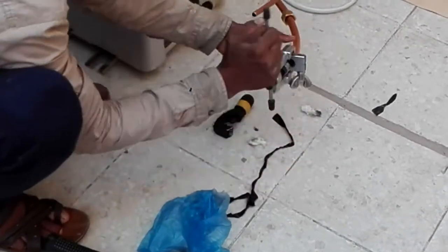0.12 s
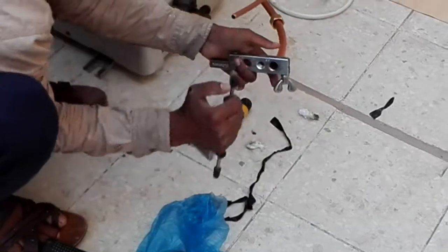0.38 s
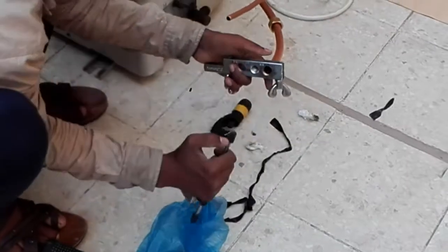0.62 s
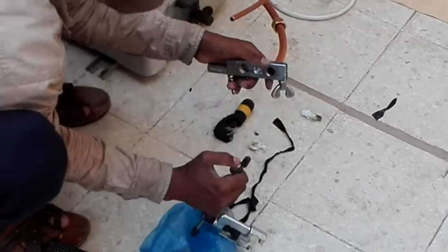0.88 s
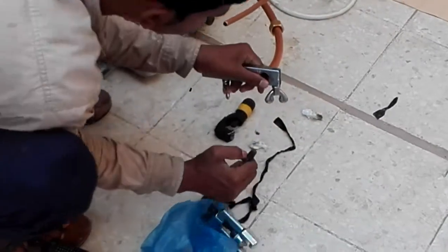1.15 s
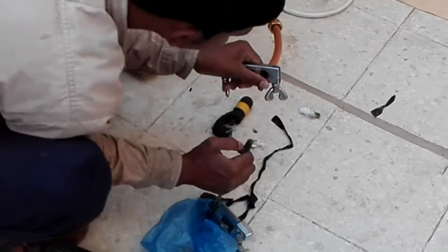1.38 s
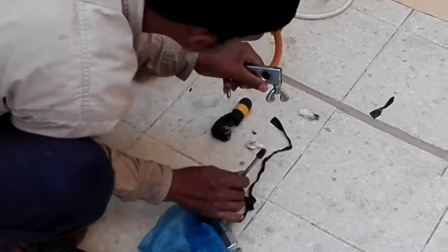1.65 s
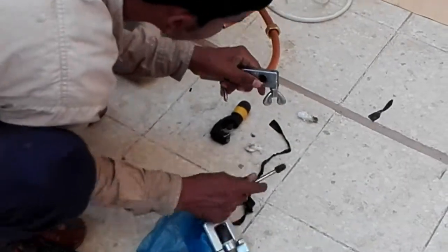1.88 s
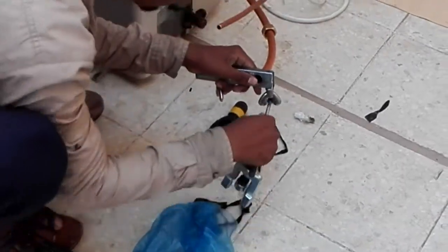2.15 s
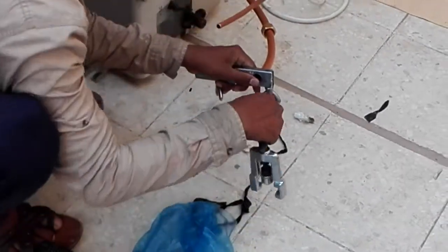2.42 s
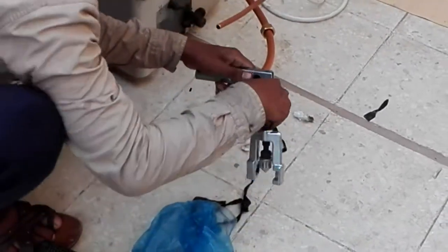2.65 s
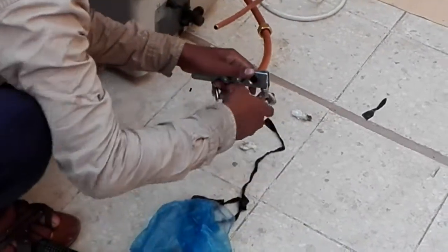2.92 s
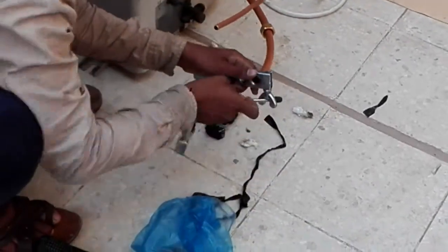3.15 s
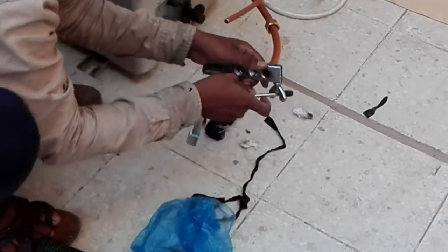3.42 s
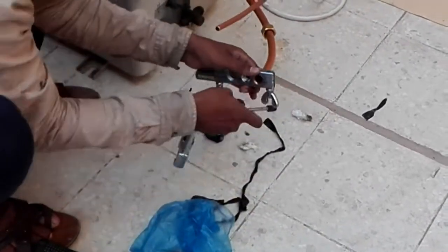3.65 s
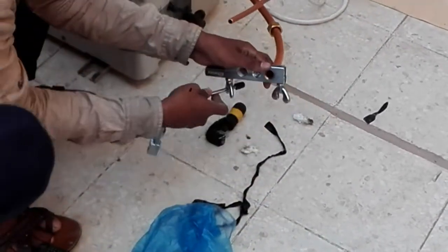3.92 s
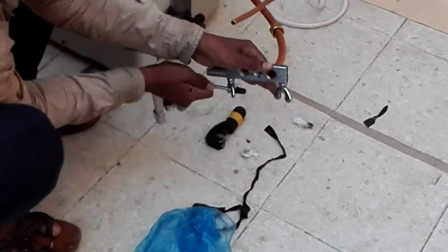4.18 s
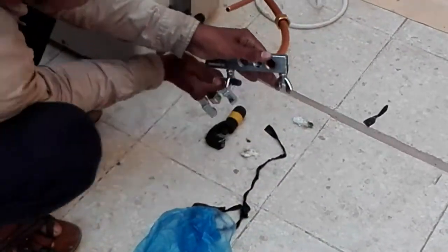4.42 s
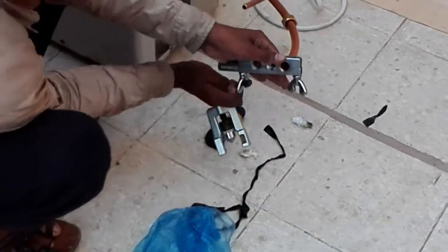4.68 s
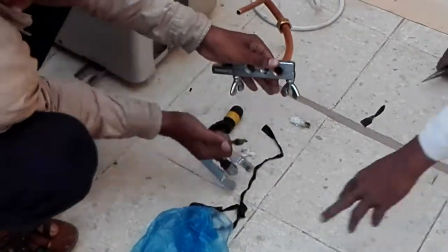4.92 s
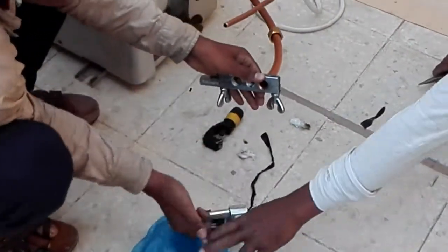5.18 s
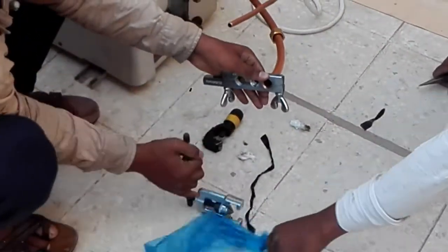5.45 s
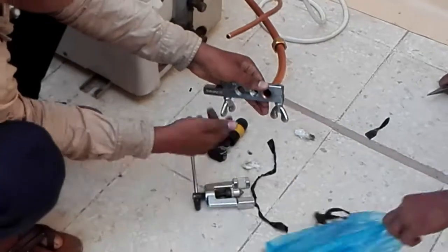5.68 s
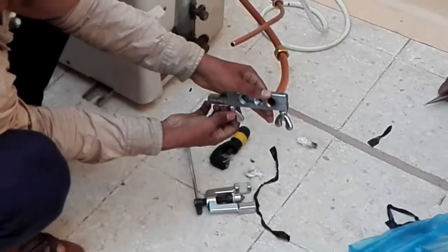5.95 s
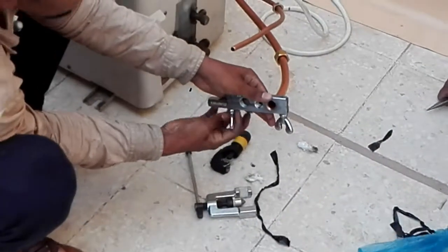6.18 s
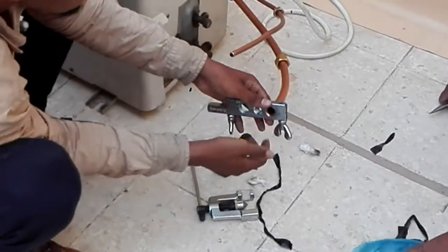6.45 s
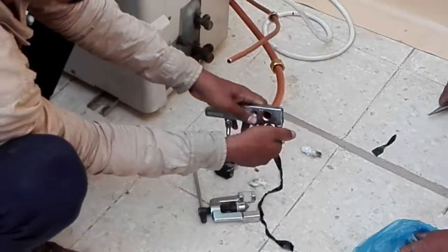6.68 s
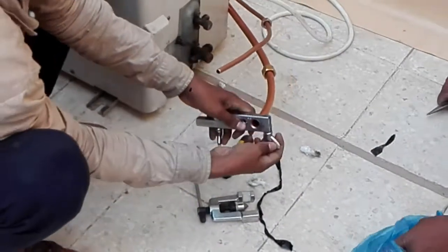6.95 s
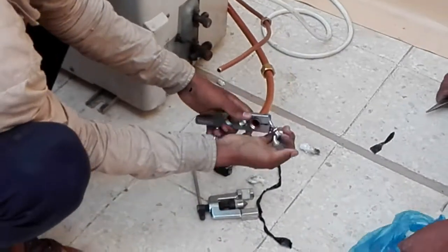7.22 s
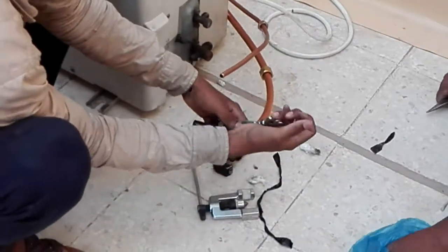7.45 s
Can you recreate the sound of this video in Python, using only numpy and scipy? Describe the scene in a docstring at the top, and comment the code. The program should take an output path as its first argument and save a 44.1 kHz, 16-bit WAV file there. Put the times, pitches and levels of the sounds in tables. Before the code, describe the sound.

Close metallic clinks and short bright clatters as steel parts are handled and set down on tile, amid soft rustling and low hum.

```python
"""Steel parts of a pipe flaring tool knock together and touch a tiled floor, close to a mono phone microphone.
Each contact cracks (noise burst) and clatters (noise through steel modes); clinks, a loose screw and a
scrape ring single modes (sines); heavy parts thump the tile (low noise).
Hands, sleeves and a plastic bag rustle in between (hiss and scuff noise in strokes).
A machine hums farther off (dull noise and blurred lines) and moving air buffets the microphone (low noise)."""
import sys
import numpy as np
from scipy import signal
from scipy.fft import rfft, irfft, next_fast_len
from scipy.io import wavfile
from scipy.ndimage import uniform_filter1d, map_coordinates

SR = 44100
rng = np.random.default_rng(int(sys.argv[2]) if len(sys.argv) > 2 else 0)


def invert_db(level):
    """Linear amplitude ratio for a level in decibels (20 dB per decade), elementwise."""
    return 10 ** (np.asarray(level, dtype=float) / 20)


def store_wav(level_fs):
    """Save 16-bit WAV to argv[1]."""
    pcm = np.round(np.clip(np.atleast_2d(level_fs), -1, 1) * 32767)
    wavfile.write(sys.argv[1], SR, pcm.T.astype(np.int16))


N = 334278
TIME_S = np.arange(N) / SR

# modes of the steel parts: f/Hz
MODES_HZ = [1082, 1150, 1230, 1370, 1600, 1800, 1975, 2130, 2300, 2450, 2640, 2850, 3140, 3720, 4320, 5140,
            5370, 5910, 6187, 7370, 7850, 8467, 9293, 9359, 9520, 10316, 12200, 14090]
GATE_DB_PER_S = 1499  # slope of sudden starts and stops


def unit(x):
    """Scaled to rms 1."""
    return x / np.sqrt(np.mean(x ** 2) + 1e-20)


def along(points, hz):
    """(Hz, value) points interpolated on a log frequency axis."""
    f, v = np.transpose(points)
    return np.interp(np.log(hz + 1), np.log(f + 1), v)


def wobble(knots_per_s):
    """Smooth random curve through normal knots."""
    knots = rng.standard_normal(int(N * knots_per_s / SR) + 4)
    return map_coordinates(knots, [np.arange(N) * knots_per_s / SR])


def filtered(x, response):
    """x times a response of frequency."""
    m = next_fast_len(len(x) + 8192)
    return irfft(rfft(x, m) * response(np.fft.rfftfreq(m, 1 / SR)), m)[:len(x)]


def rush(spectrum, patchy_db):
    """Coloured noise of rms 1 with time-frequency patches of random gain."""
    z = signal.stft(rng.standard_normal(N), nperseg=256)[2]
    field = uniform_filter1d(rng.standard_normal(z.shape), size=5, axis=0)
    field = uniform_filter1d(field, size=8, axis=1)
    patchy = signal.istft(z * invert_db(patchy_db * unit(field)), nperseg=256)[1][:N]
    return unit(filtered(patchy, lambda hz: invert_db(along(spectrum, hz))))


def add(track, s, x):
    """Mix x into track from time s."""
    track[round(s * SR):][:len(x)] += x


def room(x, wet_db):
    """Short tiled-room tail, each frequency dying at its own speed, drawn anew for every sound."""
    # f/Hz, t60/s
    decay = [(300, 0.92), (2000, 0.25), (12000, 0.12)]
    hz, t, z = signal.stft(rng.standard_normal(SR // 4), SR, nperseg=256)
    fade_db = -60 * t / along(decay, hz)[:, None]
    tail = signal.istft(z * invert_db(fade_db), SR, nperseg=256)[1]
    tail = np.pad(tail / np.linalg.norm(tail), (round(.004 * SR), 0))  # 4 ms late
    return x + invert_db(wet_db) * signal.fftconvolve(x, tail)[:len(x)]


def hum():
    """Distant machine: dull noise with blurred lines near multiples of its turning rate."""
    # dull noise spectrum: f/Hz, relative level/dB per Hz
    spectrum = [(53, -47.5), (90, -0.5), (124, -26), (278, 0.5), (395, -13), (437, -7), (467, -19),
                (500, -12), (601, -18.5), (665, -29.5), (1120, -20.5), (1220, -24), (2050, -27),
                (2390, -57.5), (5000, -40.5), (6500, -64), (11000, -120)]
    # resonances, each passed twice: f/Hz, single-pass width/Hz, single-pass relative gain/dB
    resonances = [(96.5, 8.3, -9), (196.5, 10.6, 4.5), (275.3, 14.7, 3), (607.8, 37.5, -1.5),
                  (1134, 31, -3.5)]

    def one_pass(f):
        return sum(invert_db(db) * 1j * f * w / (c * c - f * f + 1j * f * w) for c, w, db in resonances)

    tones = unit(filtered(rng.standard_normal(N), lambda f: one_pass(f) ** 2))
    noise = invert_db(-53 + 1.46 * wobble(3.676)) * rush(spectrum, patchy_db=2.5)
    return noise + invert_db(-57.0 + 2.3 * wobble(4.19)) * tones


def buffet():
    """Lumpy low rumble of air on the port, with one strong push and rebound."""
    # rumble over time: t/s, relative level/dB
    swell = [(0.0, -44.5), (0.15, -44.5), (0.27, -51.5), (0.65, -44), (1.9, -48), (2.15, -36), (2.2, -26.5),
             (2.26, -44.5), (2.7, -58), (2.79, -48.5), (3.42, -54), (3.57, -37.5), (3.61, -45.5),
             (4.83, -43), (5.15, -53), (5.62, -51), (5.72, -39), (5.93, -53), (6.84, -51), (7.58, -52)]
    # rumble spectrum: f/Hz, relative level/dB per Hz
    spectrum = [(12, -21.5), (20, 3.5), (118, -12), (152, -12), (216, -17), (300, -21.5), (390, -37.5),
                (660, -120)]
    push_s, push_db, push_hz = 2.19, -21, 49
    u = (TIME_S - push_s) * push_hz  # cycles from the push
    push = invert_db(push_db) * np.sin(2 * np.pi * u) * np.exp(-np.where(u > 0, 1.4 * u, 3 * u * u))
    lumps = invert_db(2.5 * wobble(14))
    lumpy = unit(lumps * rush(spectrum, patchy_db=2.0))
    swell_s, swell_db = np.transpose(swell)
    return invert_db(np.interp(TIME_S, swell_s, swell_db) + 1.5) * lumpy + push


def rustle():
    """Skin, cloth, thin plastic rubbing: strokes of bright hiss and duller uneven scuff over a steady floor."""
    # strokes: start t/s, rise/s, end t/s, relative hiss level/dB, relative scuff level/dB
    strokes = [(-.05, .04, 0.014, -49.5, -42), (0, .01, 0.26, -57.5, -57), (.17, 0.062, 0.29, -70, -49.5),
               (.31, 0.024, 0.48, -70, -73), (1.575, 0.02, 1.85, -61.5, -63.5),
               (2.02, 0.089, 2.156, -50.5, -62), (2.3, 0.26, 2.58, -58.5, -78),
               (2.6, 0.045, 2.84, -52.5, -56), (3.8, 0.24, 4.05, -74, -53), (4.85, 0.19, 4.95, -57, -49),
               (5.14, 0.078, 5.27, -59.5, -48.5), (5.579, 0.039, 5.72, -69, -56),
               (5.8, 0.26, 6.06, -54.5, -76), (6.06, 0.21, 6.455, -37, -45.5),
               (6.36, 0.053, 6.67, -47.5, -44.5), (6.47, 0.06, 6.7, -40.5, -57),
               (6.68, 0.033, 6.78, -56, -54), (6.8, .03, 6.9, -53.5, -74), (7.08, 0.14, 8.12, -49, -59.5),
               (7.4, 0.21, 8.9, -65, -54)]
    # spectra: f/Hz, relative level/dB per Hz
    hiss_spectrum = [(2060, -33), (3500, -5.5), (4480, -9.5), (6530, -8), (9140, -7.5), (13200, -12),
                     (14300, -7)]
    scuff_spectrum = [(500, -40), (1000, -8), (1150, -2), (1400, -6), (2300, -2), (3500, -3), (5000, -11),
                      (8000, -28)]
    rise_db, fall_db_per_s = 21.5, 422
    floor_hiss_db, floor_scuff_db = -71.5, -63.5  # steady background hiss and dull noise
    scraped_below_hz, lift_db, relative_width = 4000, 3, 0.0054  # rubbing wakes the lower steel modes

    hiss_power = invert_db(floor_hiss_db) ** 2
    scuff_power = invert_db(floor_scuff_db + 0.58 * wobble(3.18)) ** 2
    for s, rise_s, end_s, hiss_db, scuff_db in strokes:
        climb_db = -rise_db * np.clip(1 - (TIME_S - s) / rise_s, 0, 9)
        fall_db = -fall_db_per_s * np.clip(TIME_S - end_s, 0, 1)
        shape = invert_db(climb_db + fall_db) ** 2
        hiss_power = hiss_power + invert_db(hiss_db) ** 2 * shape
        scuff_power = scuff_power + invert_db(scuff_db) ** 2 * shape

    def steel_lift(hz):
        woken = [c for c in MODES_HZ if c < scraped_below_hz]
        peaks = sum(invert_db(lift_db) ** 2 / (1 + ((hz - c) / (relative_width * c)) ** 2) for c in woken)
        return np.sqrt(1 + peaks)

    grain = wobble(60)
    hiss_noise = rush(hiss_spectrum, patchy_db=1.6)
    scuff_noise = unit(filtered(rush(scuff_spectrum, patchy_db=2.0), steel_lift))
    hiss = np.sqrt(hiss_power) * invert_db(0.37 * grain) * hiss_noise
    scuff = np.sqrt(scuff_power) * invert_db(0.63 * grain - 3.5) * scuff_noise
    return hiss + scuff


def thumps():
    """The weight of a part set down drives a dull puff through the tile."""
    # t/s, relative level/dB, t60/s
    puffs = [(1.112, -34.5, 0.34), (1.821, -39, 0.11), (5.865, -27, 0.17), (6.506, -31.5, 0.09),
             (6.568, -30, 0.14), (6.612, -36, 0.18)]
    # tile spectrum: f/Hz, relative level/dB per Hz
    tile = [(60, -31), (120, -1), (200, 4), (400, -9), (700, -11.5), (1100, -34)]
    out = np.zeros(N + SR)
    t = np.arange(SR // 4) / SR
    for s, db, t60 in puffs:
        puff = unit(filtered(rng.standard_normal(len(t)), lambda hz: invert_db(along(tile, hz))))
        add(out, s, puff * invert_db(db - 60 * t / t60) * (1 - np.exp(-t / 0.0051)))
    return out[:N]


def scrape():
    """Steel dragged over steel: uneven friction feeds a few modes until the part is lifted."""
    # modes kept sounding: f/Hz, rms level/dB
    ringing = [(1150, -58), (2050, -60.5), (3720, -58.5)]
    start_s, end_s = 2.652, 2.795
    relative_blur = .07  # knots per cycle
    gate_db = -GATE_DB_PER_S * (np.clip(start_s - TIME_S, 0, 1) + np.clip(TIME_S - end_s, 0, 1))
    out = np.zeros(N)
    for hz, db in ringing:
        fed = .5 + wobble(relative_blur * hz) + 1j * wobble(relative_blur * hz)
        out += invert_db(db) * np.imag(fed * np.exp(2j * np.pi * hz * TIME_S))
    return invert_db(gate_db) * out


def chatter():
    """Loose screw: a light rattle swells, sags, is damped by hand; knocks make weak modes stutter."""
    # modes rung (nearest steel mode is used):
    # f/Hz, light rattle level/dB, full at t/s, full level/dB, damped from t/s
    ringing = [(3690, -46, 6.597, -35.5, 6.69), (5170, -49.5, 6.65, -46.5, 6.69),
               (6230, -51, 6.575, -30, 6.688), (7380, -47, 6.6, -38, 6.69),
               (8460, -46, 6.615, -27.5, 6.702), (9520, -52, 6.64, -51, 6.89),
               (14090, -51.5, 6.53, -49.5, 6.69)]
    rattle_start_s, sag_db_per_s, damp_db_per_s = 6.507, 40.5, 599
    kicks_per_s, kick_max_db, kick_decay_s = 160, -43.5, 0.011

    t = TIME_S
    out = np.zeros(N)
    kicks = rng.random(N) < kicks_per_s / SR  # same instants for all modes
    fade = np.exp(-t[:SR // 20] / kick_decay_s)
    for near_hz, light_db, full_s, full_db, damped_s in ringing:
        hz = min(MODES_HZ, key=lambda mode: abs(mode - near_hz))
        swell_db = np.maximum(light_db, full_db - GATE_DB_PER_S * (full_s - t))
        sag_db = full_db - sag_db_per_s * (t - full_s)
        fed_db = np.where(t < full_s, swell_db, sag_db)
        gate_db = -GATE_DB_PER_S * np.clip(rattle_start_s - t, 0, 1)
        gate_db = gate_db - damp_db_per_s * np.clip(t - damped_s, 0, 1)
        sizes = rng.standard_normal(N) + 1j * rng.standard_normal(N)
        jolts = signal.fftconvolve(kicks * sizes, fade)[:N]
        kick_db = np.minimum(kick_max_db, fed_db - 3.5)
        swing = invert_db(fed_db + 1.2 * wobble(60)) + invert_db(kick_db) * jolts
        carrier = np.exp(2j * np.pi * hz * t + .3j * wobble(50))
        out += np.sqrt(2) * invert_db(gate_db) * np.imag(swing * carrier)
    return out


def clinks():
    """The struck spot picks the mode, short contacts wake neighbours; rough rings cut off from 90 ms on."""
    # t/s, level/dB, most excited f/Hz, t60/s before the cut
    strikes = [(.23, -39.5, 1150, .18), (.818, -33, 4320, .11), (.845, -42, 4320, .16),
               (.822, -48, 2300, .2), (.85, -48, 2750, .12), (.819, -46, 5910, .1), (.819, -55, 8467, .22),
               (0.823, -48.5, 1150, 0.093), (.954, -39, 4320, 0.051), (.952, -41, 2450, .07),
               (.968, -44, 2640, .05), (.984, -44, 2500, .08), (1.0, -46, 2380, .12),
               (.955, -55.5, 6187, .9), (.955, -58, 7370, .45), (.977, -49, 3720, 0.2),
               (1.111, -28, 1082, 0.25), (1.112, -32, 3140, .07), (1.111, -32, 1975, 0.14),
               (1.361, -47, 1082, .31), (1.821, -21, 3720, 0.09), (1.822, -36, 5140, .06),
               (1.824, -37, 6187, .09), (1.821, -22, 10316, 0.062), (1.818, -18, 2200, .016),
               (1.8365, -19, 1800, .022), (2.649, -42, 3720, 0.093), (2.785, -49.5, 7370, .1),
               (3.033, -29.5, 4320, 0.034), (3.034, -40, 2300, 0.09), (3.034, -42, 2850, .07),
               (3.058, -44, 1800, .15), (3.072, -40, 2380, .15), (3.057, -30, 8467, .045),
               (3.056, -21, 4320, 0.058), (3.126, -41, 2380, .2), (3.124, -35, 4320, .04),
               (3.126, -38, 2850, .05), (3.14, -58, 6187, .3), (3.499, -48, 4320, 0.052),
               (3.498, -41, 2330, 0.13), (3.738, -43, 6187, 0.06), (3.956, -44, 1150, .2),
               (4.6, -53.5, 7370, .11), (4.673, -33, 1560, 0.1), (4.69, -44, 2850, .35),
               (4.688, -41, 1230, 0.7), (4.674, -33, 2740, .14), (4.67, -27, 3720, .03),
               (4.735, -34, 7850, .08), (4.777, -28, 8467, .04), (4.729, -40, 3140, .079),
               (4.737, -30, 1290, 0.22), (4.745, -33.5, 3720, 0.11), (4.796, -21, 3720, .027),
               (4.779, -30, 2850, .035), (4.799, -39, 1150, 0.3), (4.8, -35, 2640, 0.14),
               (4.855, -46, 7370, .088), (5.001, -24, 8090, .027), (5.045, -28.5, 7370, .038),
               (5.16, -49, 2050, .4), (5.193, -26, 12170, 0.075), (5.645, -51.5, 9060, .074),
               (5.647, -47, 7600, .04), (5.864, -33, 10316, .08), (5.868, -22.5, 7276, 0.082),
               (5.88, -33, 3720, 0.084), (5.9, -41, 8467, .13), (6.438, -41, 9300, .36),
               (6.508, -33, 1150, 0.25), (6.504, -25, 1900, .018), (6.53, -41, 7370, .4),
               (6.598, -36, 9320, .12), (6.614, -32, 1600, .03), (6.632, -34, 1800, .03),
               (6.674, -36, 5140, .07), (6.567, -12.5, 6187, 0.045), (6.566, -12, 3720, 0.027),
               (6.576, -29, 5140, 0.067), (6.612, -27, 10316, 0.1), (6.637, -25, 5140, .06),
               (6.793, -30, 5140, .04), (6.792, -36, 8467, 0.045), (6.878, -36, 8467, 0.04),
               (6.792, -36, 1600, .02), (6.797, -38, 3720, .07), (6.88, -45, 5140, .07),
               (6.881, -46, 3720, .05), (6.925, -50, 8467, .07), (6.931, -51, 5370, .06),
               (6.883, -39, 7850, .035)]
    out = np.zeros(N + SR)
    t = np.arange(SR // 3) / SR
    hz = np.array(MODES_HZ)[:, None]
    cut_db = -600 * np.clip(t - .09, 0, None)  # rings are cut off quickly from 90 ms on
    for s, db, struck_hz, t60 in strikes:
        slope_db_per_octave = -150 * min(t60 / .05, 1)
        mode_db = slope_db_per_octave * np.abs(np.log2(hz / struck_hz)) + 2 * rng.standard_normal(hz.shape)
        shake = unit(uniform_filter1d(rng.standard_normal((2, len(hz), len(t))), size=200))
        tones = invert_db(mode_db + 2.5 * shake[0]) * np.sin(2 * np.pi * hz * t + 0.64 * shake[1])
        envelope = invert_db(db + cut_db - 60 * t / max(t60, .01)) * (1 - np.exp(-t / 0.0011))
        add(out, s, room(np.sum(tones, axis=0) * envelope, wet_db=-17))
    return out[:N]


def blows():
    """Sharp crack, then a clatter of many short modes dying sooner in the treble, with some low sound."""
    # knocks of steel on steel; contacts with more low sound. Both:
    # t/s, relative level/dB, relative body/dB, relative brightness/dB, treble t60/s
    knocks = [(.818, -32.5, -10, -24, 0.1), (.952, -40, 2, -20.5, 0.1), (1.109, -26, 5, -15, 0.11),
              (2.649, -57, 14, 1.5, 0.047), (3.034, -41.5, -13, -10, 0.092),
              (3.056, -26.5, -7.5, -1.5, 0.054), (3.125, -38, 3, -8, 0.072), (3.497, -46, 1.5, -13, 0.086),
              (4.67, -23, -14, -6, 0.047), (4.73, -24, 0, -4, 0.059), (4.7772, -22.5, -0.5, -6, 0.052),
              (4.795, -20.5, -1.5, -12.5, 0.035), (5.001, -29.5, -6.5, -14.5, 0.099),
              (5.04, -29.5, -5, -9, 0.053), (5.046, -28.5, -6, -11, 0.035), (5.071, -45.5, 2, -1.5, 0.084),
              (5.216, -37.5, -6, -15, 0.1), (6.596, -23, -20, -6.5, 0.03), (6.815, -38, 2, -12.5, 0.026)]
    low_contacts = [(.163, -45, 11, -20, 0.059), (.23, -51.5, 17.5, -6, 0.059),
                    (.257, -46, 10.5, -11, 0.069), (.331, -56, 11.5, -11.5, 0.35),
                    (1.192, -42.5, 8, -36, 0.14), (1.362, -54, 13, -45, 0.25),
                    (1.8203, -31.5, -3.5, 0, 0.054), (1.837, -35, 8.5, -7, 0.022),
                    (3.716, -47.5, -15, -9, 0.055), (3.738, -45, -0.5, -13, 0.16),
                    (3.955, -47, 12, -18, 0.11), (4.101, -47.5, 6.5, -13.5, 0.15),
                    (4.853, -54.5, 4.5, -0.5, .065), (5.862, -32.5, 6, -13, 0.048),
                    (5.879, -35, 9.5, -11, 0.02), (5.89, -27, 2, -13, 0.051),
                    (6.5048, -23, 9.5, -23.5, 0.025), (6.5672, -11.5, -5.5, -11.5, 0.029),
                    (6.61, -28.5, 4, -2.5, 0.019), (6.622, -27.5, 2.5, -8, 0.019),
                    (6.632, -24, 2, -15.5, 0.045), (6.6504, -22.5, 2.5, -3.5, 0.03),
                    (6.673, -26, -5.5, -9, 0.027), (6.792, -35.5, 9.5, 5, 0.041),
                    (6.878, -35.5, -0.5, -2, 0.047), (6.927, -45.5, 4.5, -6, 0.054),
                    (6.685, -37.5, 2, -11, 0.032), (6.955, -45, -12, -11, 0.075),
                    (7.54, -43, 8.5, -31, 0.095)]
    # low sound over the contact's level; in the second table it grows by 0.37 dB per dB of level
    contacts = [(*row, -17.5) for row in knocks]
    contacts += [(*row, -7 + (0.37 - 1) * row[1]) for row in low_contacts]

    out = np.zeros(N + SR)
    t = np.arange(SR // 4) / SR
    modes = np.array(MODES_HZ)[:, None]
    for s, db, body_db, bright_db, t60, low_db in contacts:
        # f/Hz, relative level/dB
        colour = [(90, low_db - 11.0), (200, low_db), (450, low_db - 10.0),
                  (800, (low_db + body_db) / 2 - 12.0), (1150, body_db + 0.44 * min(low_db, 0)),
                  (1800, body_db), (2300, body_db - 0.5), (3200, 2.0), (4200, -3.5), (5300, -5.0),
                  (8000, bright_db + 9.0), (14000, bright_db - 3.5)]
        # random strength of each mode, drawn for every contact
        strength = invert_db(2.5 * rng.standard_normal(modes.shape))

        def steel(hz):
            peaks = strength ** 2 / (1 + ((hz - modes) / (0.0077 * modes)) ** 2)
            return np.sqrt(0.85 + np.sum(peaks, axis=0))

        noise = filtered(rng.standard_normal(len(t)), lambda hz: invert_db(along(colour, hz)) * steel(hz))
        dull = filtered(noise, lambda hz: 1 / (1 + (hz / 4500) ** 4))
        decay_db = -60 * t / max(t60, .005)
        clatter = dull * invert_db(0.71 * decay_db) + (noise - dull) * invert_db(decay_db)
        clatter = clatter * (1 - np.exp(-t / 0.0019))
        crack = noise * invert_db(-60 * t / 0.0074) * (1 - np.exp(-t / 0.000186))
        crack = crack * np.std(noise) / np.abs(crack).max()
        crack = crack * invert_db(14.0 - 228 * t60)  # short contacts are the hard ones
        add(out, s, room(invert_db(db + 2) * (clatter + crack), wet_db=-8.5))
    return out[:N]


def scene():
    """One microphone, heard alike on both channels."""
    steel = blows() + thumps() + clinks() + chatter() + scrape()
    return np.tile(steel + rustle() + hum() + buffet(), (2, 1))


def top_cut(x):
    """Nothing passes above the cut-off."""
    return signal.sosfilt(signal.butter(12, 15530, fs=SR, output="sos"), x)


def record(dry):
    """The recorder rolls off steeply at the top of its band."""
    top_hz = 14400

    def rolloff(hz):
        slope_db = -65 * np.clip(hz / top_hz - 1, 0, 1) / 0.101
        return invert_db(slope_db - 7.6 * (hz > top_hz))

    mono = filtered(dry[0], rolloff)
    return top_cut(np.tile(mono, (2, 1)))


dry = scene()
out = record(dry)
store_wav(out)
```